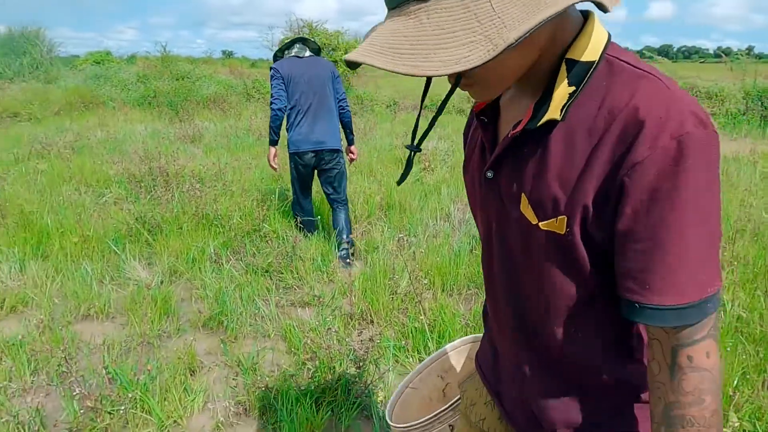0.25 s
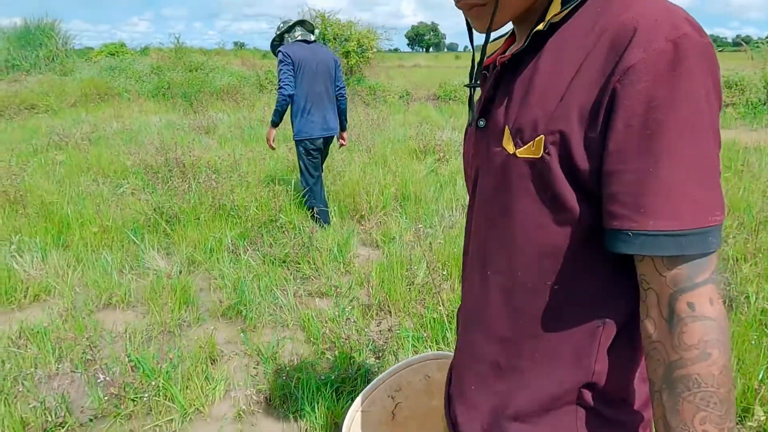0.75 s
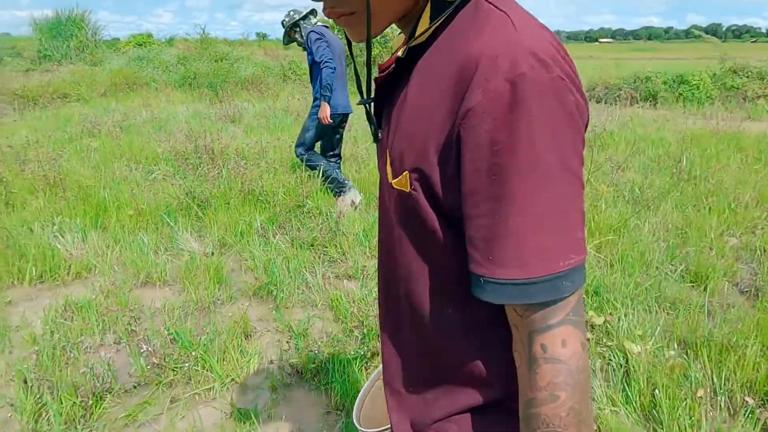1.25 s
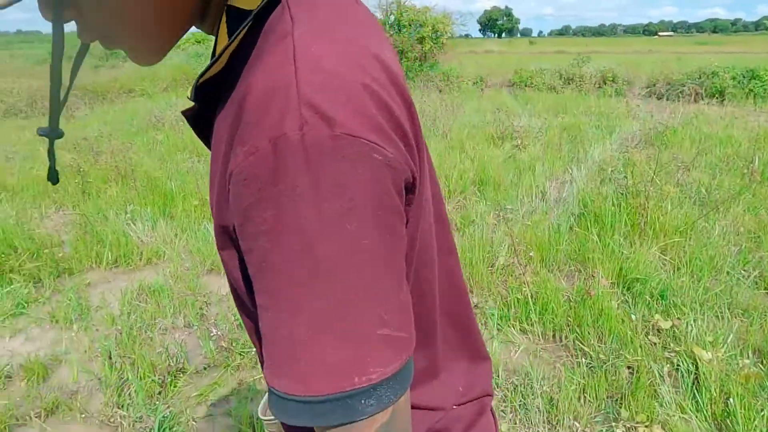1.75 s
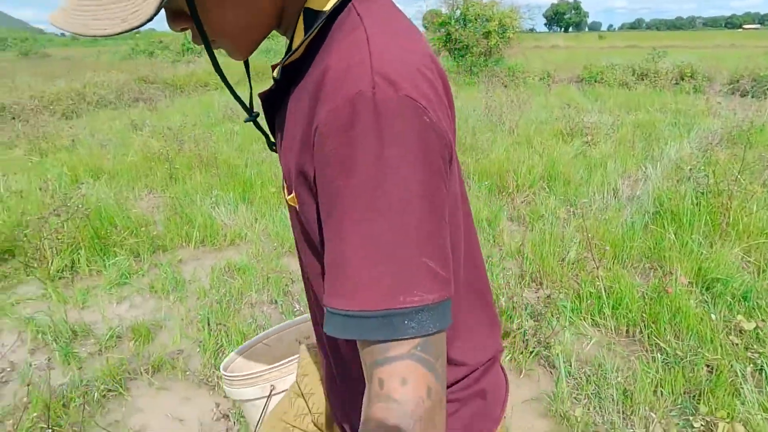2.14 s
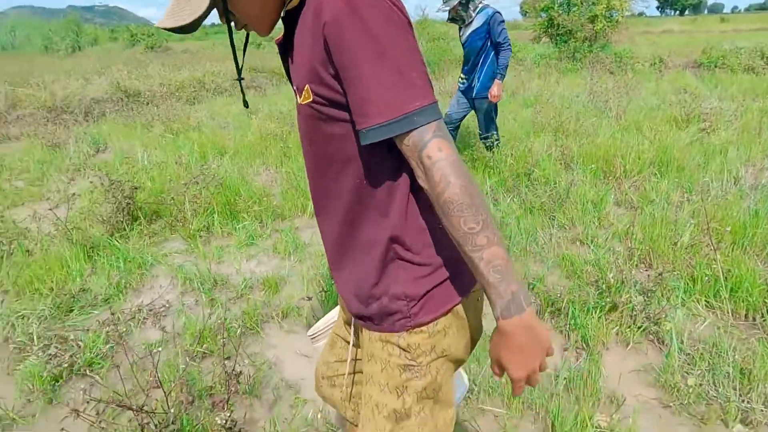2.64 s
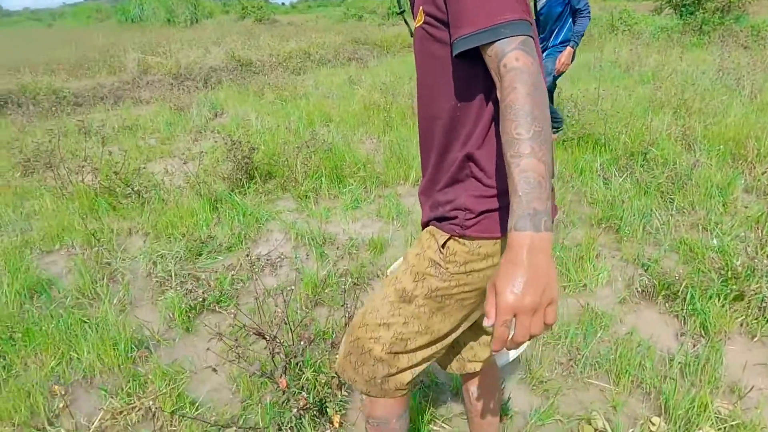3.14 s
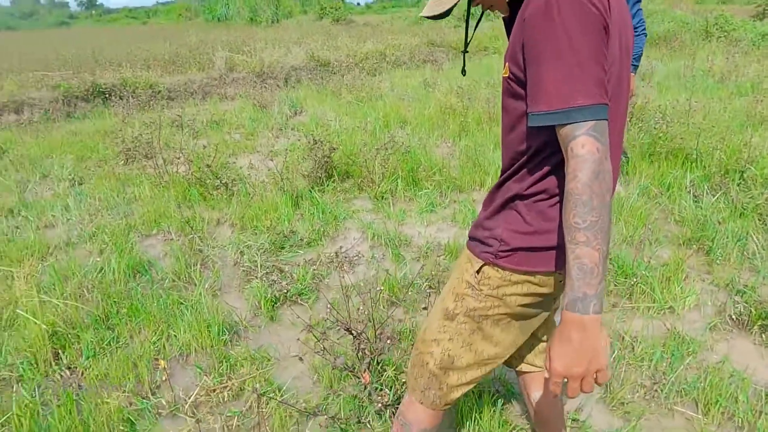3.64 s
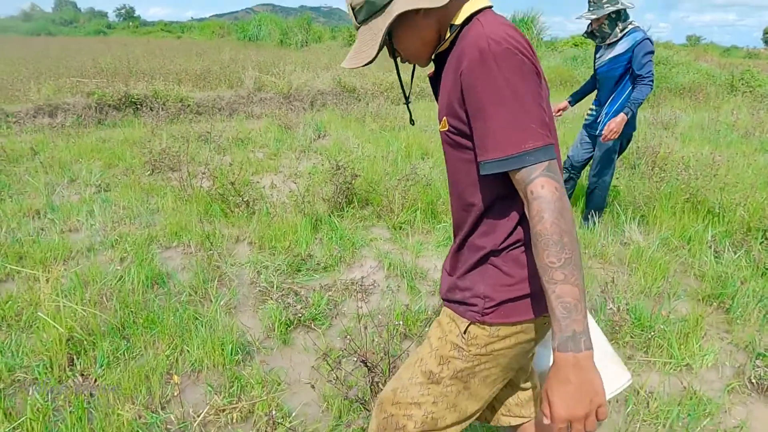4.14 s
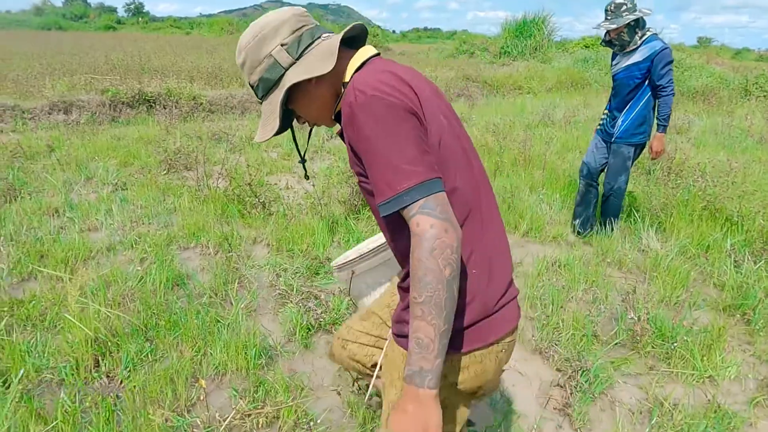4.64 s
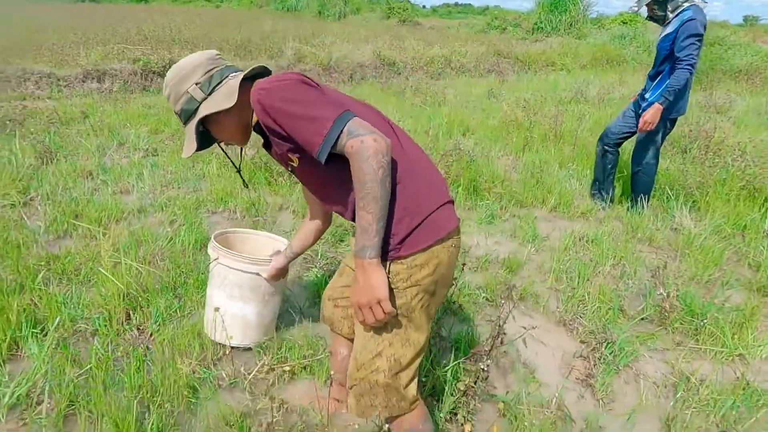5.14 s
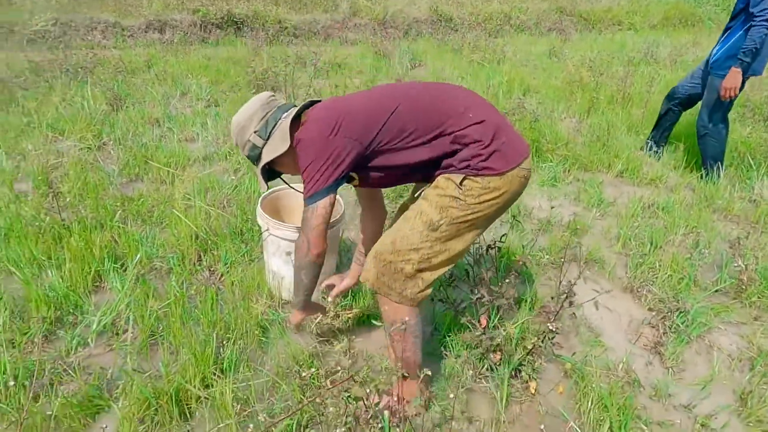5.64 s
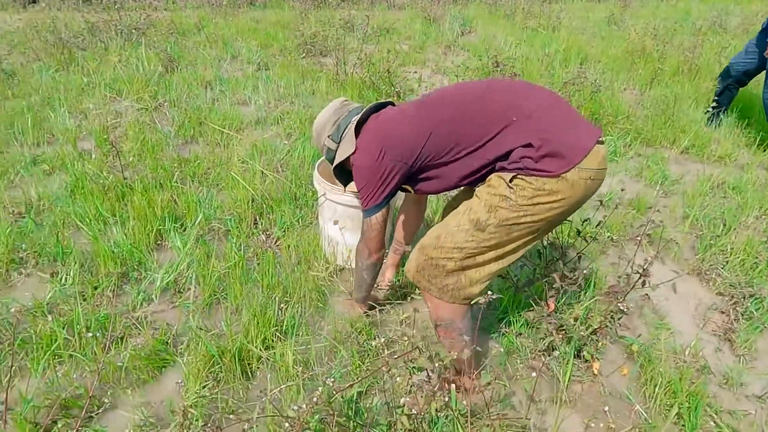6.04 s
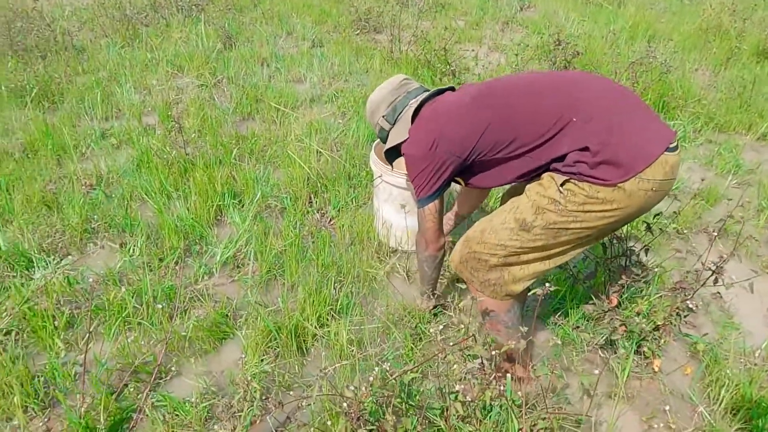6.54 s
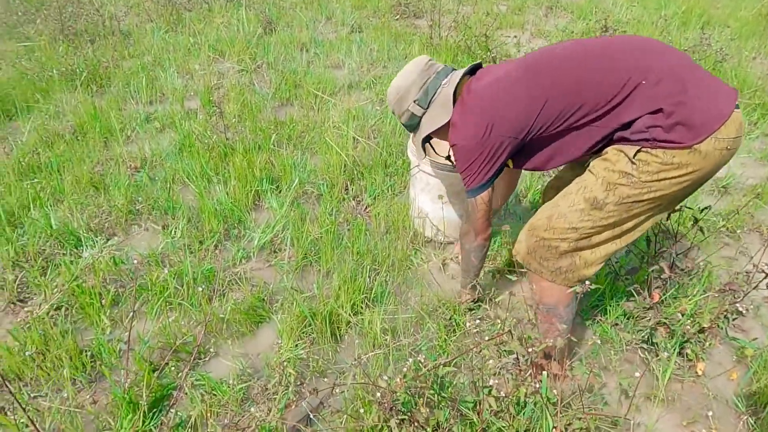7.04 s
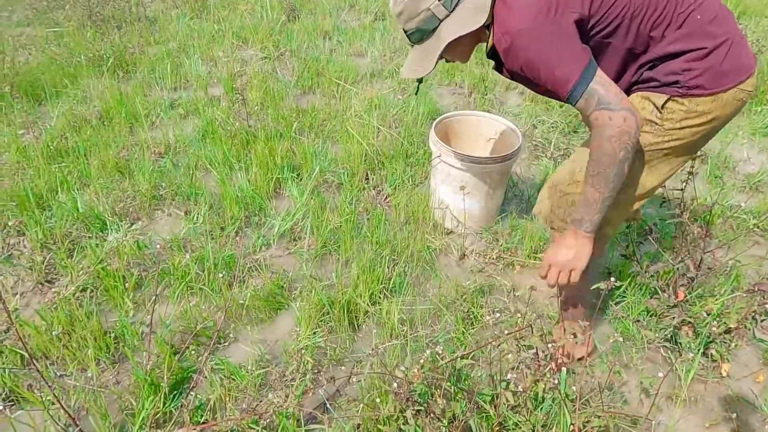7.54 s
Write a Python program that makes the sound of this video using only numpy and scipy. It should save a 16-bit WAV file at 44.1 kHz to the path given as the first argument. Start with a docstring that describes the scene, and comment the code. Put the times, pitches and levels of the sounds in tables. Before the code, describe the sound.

Wet, crunchy grass steps start immediately and continue irregularly, mixing leafy hiss, crisp ticks, gurgling mud and plopping bubbles. Strong swishes fall around two, three and a half and five and a half seconds. Muffled camera knocks lean right, gusty low rumble lies below, and thin field air hisses behind. A tiny far bird whistles past six seconds. Dry outdoor space, close stereo microphone.

```python
"""Feet and hands in wet grass

Bare feet and hands work through wet grass and shallow mud in an open field, close to a camera.
Filtered noise and short ringing grains make the rustle and slosh of each stroke. Noise bursts with a tick
make slaps and snaps, rising tones make bubbles, and gliding sines a faint far bird. Low noise is wind on
the microphone; decaying modes are bumps on the camera body, mostly heard on the right."""
import sys
import numpy as np
from scipy import signal
from scipy.fft import rfft, irfft
from scipy.io import wavfile
from scipy.ndimage import uniform_filter1d

SR = 44100
rng = np.random.default_rng(int(sys.argv[2]) if len(sys.argv) > 2 else 0)


def int16_out(signal):
    """Quantize to a 16-bit WAV file."""
    q = np.round(np.clip(np.atleast_2d(signal).T, -1, 1) * 32767)
    wavfile.write(sys.argv[1], SR, q.astype(np.int16))


N = 343169

# Colour of rustling grass. Each row: frequency in Hz, relative density in dB per Hz.
RUSTLE_COLOUR = [(240, -2.5), (400, -6.5), (666, -6.5), (742, 0.5), (1130, -1), (1930, -3.5), (3530, -4.5),
                 (5960, -10), (7400, -7.5), (12100, -20.5), (13900, -21), (16000, -59)]
# Strokes of feet and hands through the grass. Each row: peak time in seconds, rustle level in dB,
# rise in seconds, fade in seconds, slosh re rustle in dB, fizz re rustle in dB.
GRASS_STROKES = [(0.034, -30.5, 0.15, 0.11, -28, -7), (.18, -44.5, 0.41, 0.26, -10.5, -10.5),
                 (.29, -46.5, 0.11, 0.046, -30, -7), (0.51, -36.5, 0.065, 0.53, 3.5, -21.5),
                 (.732, -38.5, 0.066, 0.13, -4, -10.5), (.868, -36, 0.052, 0.74, -1, -11),
                 (1.067, -33, 0.11, 0.37, -0.5, -11.5), (1.371, -41, 0.37, 0.19, -2, -11),
                 (1.884, -42.5, 0.34, 0.18, -2, -9), (2.074, -27.5, .015, 0.19, -5.5, -11),
                 (2.327, -36, 0.17, 0.15, -3.5, -16), (2.506, -37, 0.29, 0.12, -13, -6),
                 (2.642, -50, 0.25, 0.19, 8.5, -21), (2.762, -38, 0.033, 0.056, 3, -23),
                 (2.883, -43, 0.22, 0.68, 2.5, -10), (3.405, -32, 0.02, 0.11, -24, -7.5),
                 (3.537, -38.5, 0.032, 0.18, -4.5, -10), (3.692, -40.5, 0.17, 0.074, -5.5, -13),
                 (3.776, -26.5, 0.016, 0.048, -32, -11.5), (3.863, -39, 0.15, 0.48, -5.5, -28),
                 (3.977, -41, 0.2, 0.22, 0.5, -6.5), (4.266, -37.5, 0.037, 0.14, -3, -12),
                 (4.497, -42, 0.069, 0.4, -3, -6.5), (4.661, -50, 0.17, 0.69, 8.5, -16),
                 (4.823, -48, 0.059, 1, -3, -17), (5.001, -35, 0.064, 0.27, 1, -13.5),
                 (5.363, -25.5, 0.014, 0.1, -8.5, -10), (5.48, -40, 0.62, 0.78, 3, -9.5),
                 (5.86, -31.5, 0.026, 0.083, -3.5, -3.5), (6.023, -34, 0.17, 0.086, -3, -10),
                 (6.12, -48.5, 0.029, 0.42, 4.5, -4.5), (6.5, -51, 0.16, 0.84, 5.5, -18),
                 (6.755, -41.5, 0.15, 0.29, -12, -11), (6.946, -38.5, 0.12, 0.087, 1, -18),
                 (7.1, -47, 0.17, 0.7, -29, -13), (7.293, -48, 0.065, 0.34, 3.5, -15),
                 (7.59, -45, 0.055, 0.44, 3.5, -13), (7.77, -38, 0.063, 0.11, 2.5, -8)]


def gain_of(db):
    """Amplitude factor of a level in dB."""
    return 10 ** (np.asarray(db) / 20)


def evened(x):
    """Scale to unit RMS."""
    return x / np.sqrt(np.mean(x ** 2) + 1e-20)


def read(points, hz):
    """Interpolate a table over log frequency."""
    f, value = np.transpose(points)
    return np.interp(np.log(hz + 1), np.log(f + 1), value)


def add(mix, start_s, sound, pan_db=0.):
    """Mix in a mono sound; pan_db is left re right."""
    part = mix[:, round(start_s * SR):][:, :len(sound)]
    part += gain_of([[pan_db / 2], [-pan_db / 2]]) * sound[:part.shape[1]]


def ring(hz, t60_s, octaves=0., rise_s=.001):
    """A dying tone with a soft start; its pitch climbs by the given octaves per half t60."""
    t = np.arange(round((t60_s + 3 * rise_s) * SR)) / SR
    pitch_hz = hz * 2 ** (2 * octaves * t / t60_s)
    turns = np.cumsum(pitch_hz) / SR
    shape = (1 - np.exp(-t / rise_s)) ** 2 * gain_of(-60 * t / t60_s)
    return shape / shape.max() * np.sin(2 * np.pi * turns)


def roughened(tone, wobble, hz):
    """The ring swells and dips from one cycle to the next."""
    roughness = .5
    swell = evened(uniform_filter1d(wobble, size=round(SR / hz)))
    return tone * (1 + roughness * swell[:len(tone)])


def noise(spectrum, size, patchy_db, flicker_db, tilt_db=None):
    """Random short-time spectra with drifting patches and flicker shared by all bins; unit RMS before tilt."""
    # Each row: frequency in Hz, left-right likeness from 0 to 1.
    likeness = [(40, .92), (150, .92), (500, .9), (1600, .92), (5000, .8), (7500, .88), (14000, .7)]
    hop = size // 4
    frames, hz = N // hop + 5, np.fft.rfftfreq(size, 1 / SR)

    def to_sound(spectra):
        return signal.istft(spectra, nperseg=size, noverlap=size - hop)[1]

    a, b, c, d, patches = rng.standard_normal((frames, len(hz), 5)).T
    patches = uniform_filter1d(patches, size=4, axis=0)  # across bins
    patches = evened(uniform_filter1d(patches, size=8, axis=1))  # across frames
    flicker = evened(uniform_filter1d(rng.standard_normal(frames), size=3))
    same = np.clip(read(likeness, hz), -1, 1)[:, None]
    left = a + 1j * b
    right = same * left + np.sqrt(1 - same ** 2) * (c + 1j * d)
    level_db = read(spectrum, hz)[:, None] + patchy_db * patches + flicker_db * flicker
    spectra = np.array([left, right]) * gain_of(level_db)
    rms = np.sqrt(np.mean(to_sound(spectra) ** 2))
    if tilt_db:
        spectra *= gain_of(tilt_db(hz[:, None], np.arange(frames) * hop / SR))
    return to_sound(spectra)[:, :N] / rms


def grains(spectrum, lo_hz, hi_hz, cycles, octaves, per_s, spread_db, wide_db, count):
    """Sparse clicks of uneven size, each ringing one short tone somewhere left or right."""
    out = np.zeros((2, N))
    for hz in np.geomspace(lo_hz, hi_hz, count):
        chance, size, side = rng.random((N, 3)).T
        struck = chance < per_s / count / SR
        clicks = struck * gain_of(-spread_db * np.log(size + 0.004))
        tone = ring(hz, cycles / hz, octaves, 1.4 / hz)
        tone *= gain_of(read(spectrum, hz)) * np.sqrt(hz) / np.linalg.norm(tone)
        pan = gain_of(wide_db * np.outer([1, -1], side - .5))
        out += signal.oaconvolve(clicks * pan, tone[None], axes=1)[:, :N]
    return evened(out)


def far_field():
    """Far grass, insects and air: steady, slightly flickering noise."""
    # Each row: frequency in Hz, relative density in dB per Hz.
    field_colour = [(200, -38), (700, -7), (1600, -14), (3350, -41), (4400, -3.5), (6300, -16.5),
                    (7700, -3.5), (8200, -14.5), (11000, -16.5), (16000, -26)]
    level_db = -57.5
    return gain_of(level_db) * noise(field_colour, size=512, patchy_db=2, flicker_db=1)


def bird():
    """Faint far whistles, each a short sine gliding down."""
    # Each row: start in seconds, length in seconds, level in dB, start pitch in Hz, end pitch in Hz.
    notes = [(6.354, .04, -56, 4900, 4500), (6.392, .028, -55, 5050, 4480), (6.434, .03, -55, 5100, 4480),
             (6.482, .05, -55, 5050, 4450)]
    out = np.zeros((2, N))
    for start_s, length_s, db, from_hz, to_hz in notes:
        glide = np.linspace(1, 0, round(length_s * SR)) ** 1.5
        hz = to_hz + (from_hz - to_hz) * glide
        whistle = np.sin(2 * np.pi * np.cumsum(hz) / SR)
        add(out, start_s, gain_of(db) * np.sqrt(np.hanning(len(hz))) * whistle)
    return out


def wind():
    """Lumpy low noise on the microphone; gusts swell the deepest part while the upper edge holds still."""
    # Each row: time in seconds, rumble level in dB.
    gusts = [(0, -43.5), (1.15, -44), (1.3, -38.5), (1.7, -39), (1.85, -45.5), (3.3, -48.5), (4, -46.5),
             (4.7, -42), (5.05, -48.5), (5.25, -37), (5.65, -46), (6.15, -42), (7.78, -43.5)]
    # Each row: frequency in Hz, relative density in dB per Hz.
    rumble_colour = [(15, -22), (30, 4.5), (41, -11), (51, 8.5), (63, 1.5), (170, -7), (300, -19),
                     (440, -29.5), (650, -68)]
    edge_db = -42  # the upper edge holds as if the rumble stayed at this level

    def gust_db(t):
        return np.interp(t, *np.transpose(gusts))

    def upper_db(hz, t):
        edge_share = np.clip(np.log2((hz + 1) / 70), 0, 1)
        return edge_share * (edge_db - gust_db(t))

    rumble = noise(rumble_colour, size=4096, patchy_db=1.2, flicker_db=.8, tilt_db=upper_db)
    return gain_of(gust_db(np.arange(N) / SR)) * rumble


def bumps():
    """The struck spot on the camera body rings at its own pitch, and the whole shell answers with its modes."""
    # Each row: start in seconds, level in dB, pitch in Hz, t60 in seconds, left re right in dB.
    knocks = [(1.487, -31.5, 326, 0.05, -14), (1.499, -28.5, 341, 0.04, -14),
              (1.514, -32.5, 350, 0.077, -17), (1.572, -36, 157, 0.024, 15), (1.637, -28, 189, 0.029, -12),
              (2.109, -31, 401, 0.076, -2), (2.148, -34, 228, 0.06, -19), (2.501, -26, 197, 0.02, -13),
              (2.514, -38, 348, 0.034, -15), (2.842, -27, 200, 0.019, -7), (4.57, -29.5, 200, 0.045, -12),
              (5.009, -29.5, 292, 0.072, 1), (5.274, -40.5, 235, 0.35, -1), (5.377, -36.5, 239, 0.23, 1.5),
              (6.075, -37.5, 180, .05, -7), (6.125, -39.5, 264, .09, -11)]
    # Modes of the shell. Each row: frequency in Hz, level re struck spot in dB, t60 in seconds.
    shell_modes = [(137.3, -7.5, 0.042), (364, -18, 0.13), (624, -22.5, 0.047), (885, -29, 0.064)]
    out = np.zeros((2, N))
    wobbles = rng.standard_normal((len(knocks), 16384))
    for (start_s, db, hz, t60_s, pan_db), wobble in zip(knocks, wobbles):
        spot = roughened(ring(hz, t60_s, rise_s=.0014), wobble, hz)
        add(out, start_s, gain_of(db) * spot, pan_db)
        for mode_hz, mode_db, mode_t60_s in shell_modes:
            mode = roughened(ring(mode_hz, mode_t60_s, rise_s=.0027), wobble[::-1], mode_hz)
            add(out, start_s, gain_of(db + mode_db) * mode, 0.71 * pan_db)
    return out


def bubbles():
    """Each air pocket popping in the mud rings unevenly, rising in pitch as the cavity shrinks."""
    # Each row: start in seconds, level in dB, starting pitch in Hz, t60 in seconds.
    pockets = [(0.106, -33, 2580, 0.015), (0.343, -38, 1930, 0.026), (0.428, -39, 1640, 0.034),
               (1.297, -30.5, 457, 0.02), (1.34, -27.5, 813, 0.017), (1.366, -26.5, 1030, 0.015),
               (1.371, -26.5, 1800, 0.024), (1.452, -30.5, 1065, 0.03), (1.741, -37, 1440, 0.032),
               (1.82, -36.5, 504, 0.076), (2.124, -22.5, 1210, 0.022), (2.139, -22, 835, 0.014),
               (2.334, -23.5, 1330, 0.014), (2.618, -34.5, 906, 0.041), (2.708, -32.5, 985, 0.037),
               (2.755, -27, 900, 0.035), (2.847, -22.5, 978, 0.041), (2.873, -31, 990, 0.028),
               (2.905, -32.5, 987, 0.047), (2.975, -35, 1160, 0.041), (3.025, -40.5, 554, 0.077),
               (3.119, -39, 923, .07), (3.45, -28.5, 1340, 0.018), (3.503, -28.5, 1200, 0.0081),
               (3.773, -19, 1727, 0.023), (3.853, -30.5, 1013, 0.074), (3.902, -24, 1693, 0.052),
               (3.968, -32, 750, 0.05), (4.022, -29.5, 950, 0.022), (4.629, -27.5, 924, 0.039),
               (4.806, -30.5, 910, 0.058), (4.981, -23.5, 680, 0.0079), (5.039, -25.5, 1362, 0.016),
               (5.173, -30.5, 1080, 0.017), (5.429, -24, 866, 0.014), (5.459, -20.5, 1074, 0.037),
               (5.563, -26, 636, 0.036), (5.735, -35, 796, 0.021), (5.859, -25.5, 1404, 0.019),
               (6.017, -29.5, 1380, 0.034), (6.112, -36.5, 2190, 0.019), (6.24, -40, 950, 0.034),
               (6.423, -36, 1090, 0.018), (6.464, -35, 940, 0.014), (6.666, -24.5, 1190, 0.0023),
               (7.269, -35.5, 732, 0.057), (7.291, -39, 904, 0.072), (7.315, -37, 620, 0.044),
               (7.518, -40, 1380, 0.017), (7.532, -38, 1435, 0.015), (7.594, -31, 767, 0.019),
               (7.633, -39, 667, 0.086), (7.645, -36, 1450, 0.025), (7.664, -34, 1620, 0.036),
               (7.768, -35, 950, .03)]
    out = np.zeros((2, N))
    wobbles = rng.standard_normal((len(pockets), 8192))
    for (start_s, db, hz, t60_s), wobble in zip(pockets, wobbles):
        pop = roughened(ring(hz, t60_s, octaves=.2, rise_s=1.3 / hz), wobble, hz)
        add(out, start_s, gain_of(db) * pop, pan_db=-1.2)
    return out


def splats():
    """Slaps and snaps: a sharp tick and a lumpy spray of droplets, a broad band round its own centre."""
    # Soles slapping water, stems snapping.
    # Each row: start in seconds, reference level in dB, centre in Hz, t60 of the spray in seconds.
    slaps = [(.009, -17, 4600, 0.023), (0.21, -25.5, 2530, 0.021), (0.8518, -8, 2820, 0.027),
             (0.8573, -7.5, 3550, 0.028), (0.885, -24, 3760, 0.12), (1.086, -11, 3160, 0.021),
             (1.184, -23.5, 2040, 0.11), (1.247, -23, 2730, 0.02), (1.322, -17.5, 2720, 0.021),
             (1.3407, -22, 1730, 0.015), (2.0677, -19, 2860, 0.0061), (2.126, -14, 2300, 0.022),
             (2.326, -17.5, 1670, 0.072), (2.3998, -22, 2670, 0.028), (2.466, -22, 3000, 0.02),
             (2.646, -24.5, 1960, 0.028), (2.793, -29.5, 4960, 0.024), (2.885, -26, 4330, 0.034),
             (2.915, -25, 2800, .02), (2.972, -27, 3480, 0.07), (3.022, -27.5, 2880, 0.055),
             (3.0768, -24, 3150, 0.013), (3.3988, -13.5, 2220, 0.022), (3.4091, -14, 2630, 0.021),
             (3.442, -20.5, 2180, 0.082), (3.5557, -27.5, 4550, 0.088), (3.672, -22.5, 2130, 0.046),
             (3.772, -14, 2270, 0.033), (3.932, -19.5, 2660, 0.021), (3.959, -21, 2440, 0.07),
             (4.0978, -23, 4550, 0.015), (4.1095, -26, 2740, 0.017), (4.1305, -22.5, 1930, 0.017),
             (4.145, -29, 1800, 0.013), (4.251, -27, 3330, 0.022), (4.5156, -22, 2230, 0.016),
             (4.626, -23.5, 4620, 0.023), (4.766, -21, 8200, 0.014), (5.0056, -15, 6800, 0.037),
             (5.236, -23, 3830, 0.014), (5.3611, -14.5, 3600, 0.024), (5.552, -17, 4470, 0.015),
             (5.636, -21, 3300, 0.028), (5.846, -20.5, 2850, 0.064), (5.887, -15, 4800, 0.024),
             (6.156, -18, 4230, 0.041), (6.423, -25.5, 1700, 0.011), (6.9, -23.5, 2930, 0.031),
             (6.936, -24.5, 1840, 0.089), (7.118, -32, 4600, .02), (7.353, -29, 4770, 0.022)]
    spray_db, tick_db = -8, -2  # re reference level
    size = 4096
    out, bins_hz = np.zeros((2, N)), np.fft.rfftfreq(size, 1 / SR)
    draws, t = rng.standard_normal((len(slaps), 2, size)), np.arange(size) / SR
    for (start_s, db, hz, t60_s), (spray, lumps) in zip(slaps, draws):
        octaves_off = abs(np.log2((bins_hz + 1) / hz))
        colour_db = read(RUSTLE_COLOUR, bins_hz) - 19 * octaves_off
        spray = evened(irfft(rfft(spray) * gain_of(colour_db)))
        # droplets land in bunches about 1 ms long
        lumps = np.clip(evened(uniform_filter1d(lumps, size=40)), -2, 1)
        shape = np.minimum(t / .0008, 1) * gain_of(3.5 * lumps - 60 * t / t60_s)
        tick = ring(hz, 5 / hz, rise_s=.00015)
        add(out, start_s, gain_of(db + spray_db) * spray * shape, 0.86 * lumps[0])
        add(out, start_s, gain_of(db + tick_db) * tick, 1.3 * lumps[0])
    return out


def stroke_envelope(offset_db=0., lag_s=0., linger=1.):
    """Each stroke climbs and drops straight in dB around its peak; overlapping strokes add their power."""
    span_db, step = 20, 64  # change over one rise or fade; samples per envelope point
    peak_s, level_db, rise_s, fade_s = np.transpose(GRASS_STROKES)[:4, :, None]
    since_s = np.arange(0, N + step, step) / SR - peak_s - lag_s
    below_db = span_db * np.maximum(-since_s / rise_s, since_s / (linger * fade_s))
    power = gain_of(2 * (level_db + offset_db - below_db)).sum(axis=0)
    return np.interp(np.arange(N) / step, np.arange(len(power)), np.sqrt(power))


def grass():
    """Blades hiss and crackle under the stroke, dry tips fizz, wet ground sloshes with small bubbles in it."""
    slosh_db, fizz_db = np.transpose(GRASS_STROKES)[4:, :, None]

    def middle_db(hz, t):
        return -25 * ((hz < 1600) | (hz > 6000))

    def top_db(hz, t):
        return 9 - 25 * (hz < 6000)

    def bottom_db(hz, t):
        return -25 * (hz > 1600)

    hiss = noise(RUSTLE_COLOUR, size=256, patchy_db=4, flicker_db=1, tilt_db=middle_db)
    crackle = grains(RUSTLE_COLOUR, 1500, 6000, cycles=11, octaves=.1, per_s=2600,
                     spread_db=4.1, wide_db=10, count=14)
    drips = grains(RUSTLE_COLOUR, 1200, 5000, cycles=30, octaves=.35, per_s=220,
                   spread_db=3, wide_db=9, count=14)
    body = .58 * hiss + .66 * crackle + .48 * drips

    fizz = noise(RUSTLE_COLOUR, size=256, patchy_db=4.5, flicker_db=2.5, tilt_db=top_db)
    ticks = grains(RUSTLE_COLOUR, 5500, 9000, cycles=16, octaves=.1, per_s=300,
                   spread_db=5, wide_db=4, count=8)
    crisp = .85 * fizz + .8 * ticks

    slosh = noise(RUSTLE_COLOUR, size=512, patchy_db=5, flicker_db=1.5, tilt_db=bottom_db)
    gurgle = grains(RUSTLE_COLOUR, 480, 1700, cycles=15, octaves=.25, per_s=900,
                    spread_db=3.4, wide_db=6, count=14)
    wet = .65 * slosh + .8 * gurgle

    stroked = stroke_envelope() * body
    stroked += stroke_envelope(slosh_db, lag_s=.01, linger=.54) * wet  # water follows the blades a little late
    stroked += stroke_envelope(fizz_db, linger=.66) * crisp
    # blades give way in bunches
    clumps_s, clumps_db = .015, 1.3
    clumps = evened(uniform_filter1d(rng.standard_normal(N), size=round(clumps_s * SR)))
    return gain_of(clumps_db * clumps) * stroked


def scene():
    """Sum of background, handling noise and the near sources."""
    background = far_field() + bird() + wind()
    near = bubbles() + splats() + grass()
    return background + bumps() + near


def record(dry):
    """Sound reaches the right port slightly first and louder; the top is dulled, then band-limited."""
    # Each row: frequency in Hz, phase lead of the left port in radians.
    left_lead = [(200, 0), (1100, -.3), (3300, -.6), (5800, -.8), (7100, -.1)]
    edge_hz = 15700
    hz = np.fft.rfftfreq(N, 1 / SR)
    phase = np.exp(1j * np.outer([.5, -.5], read(left_lead, hz)))
    balance = gain_of([[-.25], [.25]])
    dulling = 1 / (1 + (hz / 12000) ** 6)
    ports = irfft(rfft(dry, axis=1) * phase * balance * dulling, N, axis=1)
    band_limit = signal.firwin(511, edge_hz, window=("kaiser", 9), fs=SR)
    return signal.oaconvolve(ports, band_limit[None], "same", axes=1)


dry = scene()
out = record(dry)
int16_out(out)
```